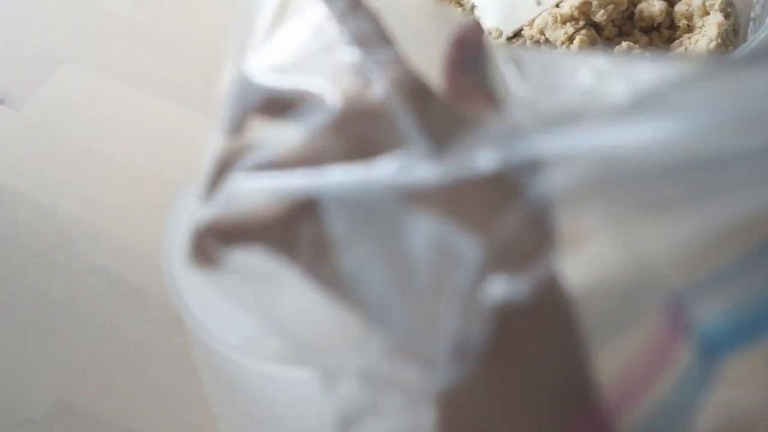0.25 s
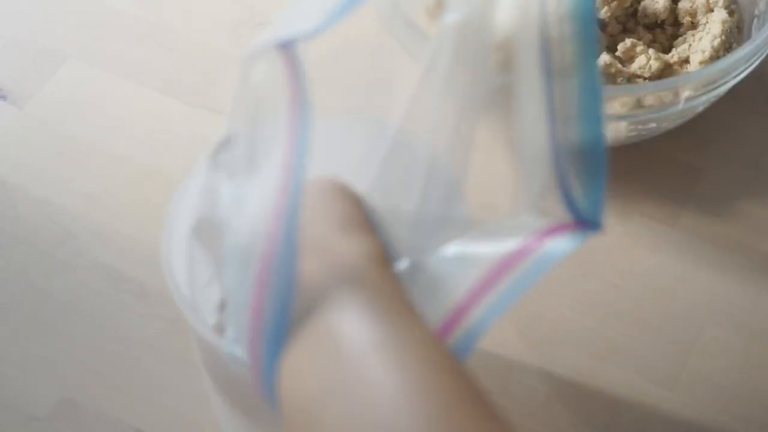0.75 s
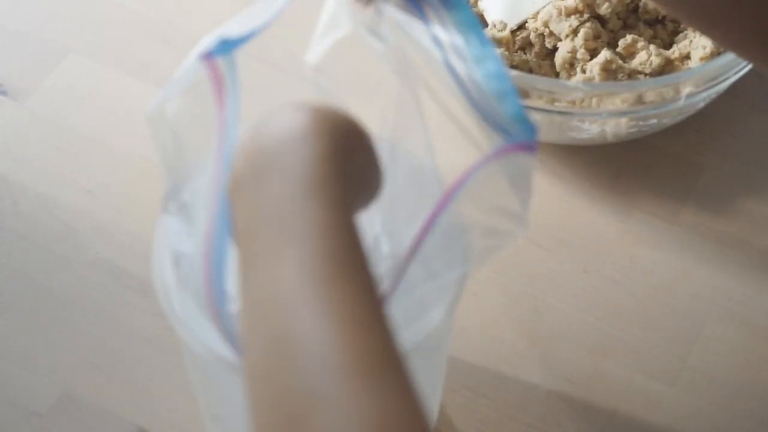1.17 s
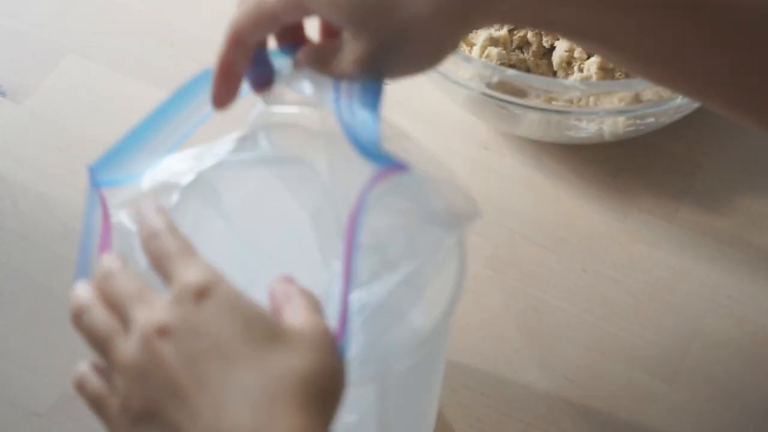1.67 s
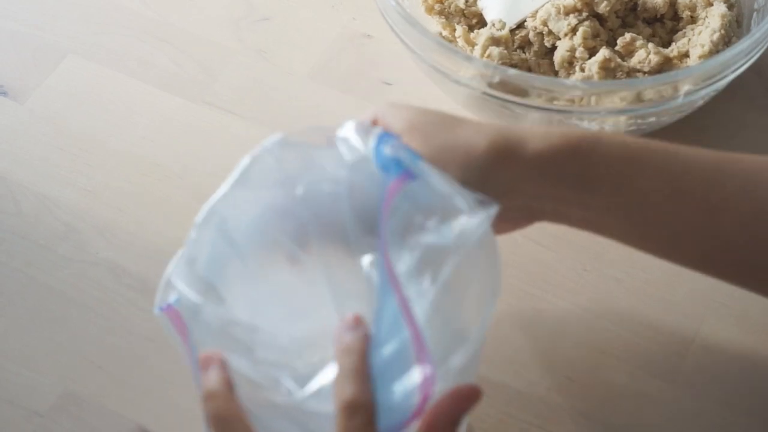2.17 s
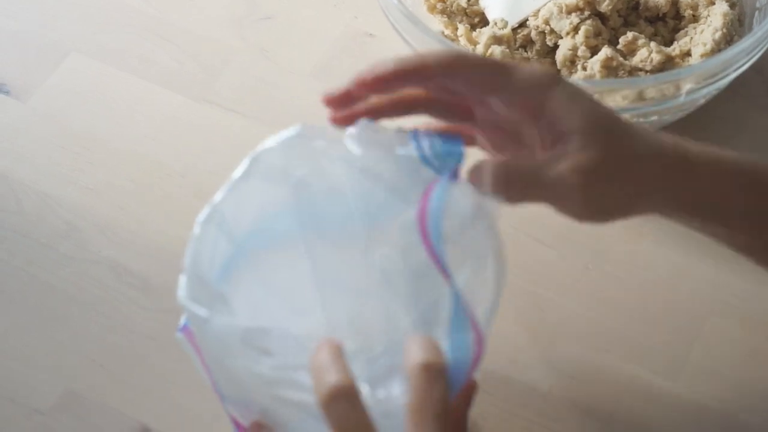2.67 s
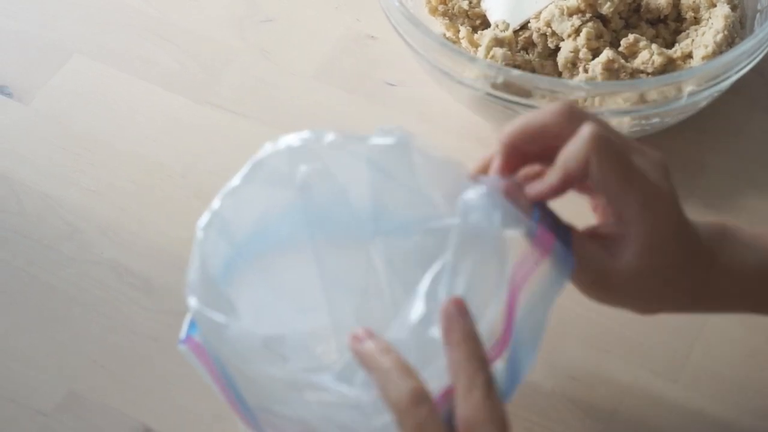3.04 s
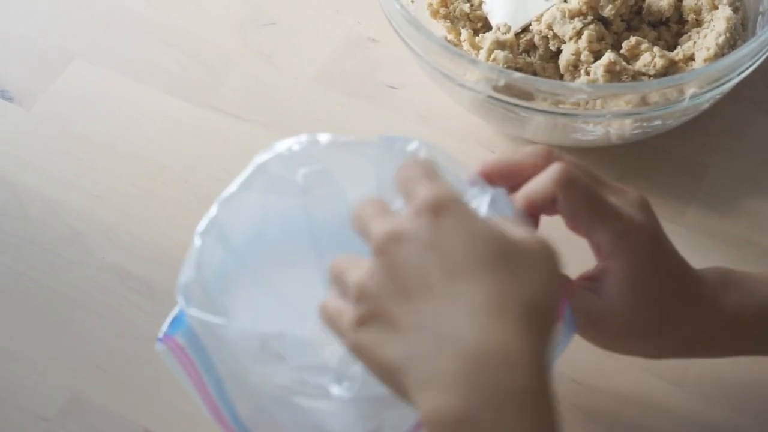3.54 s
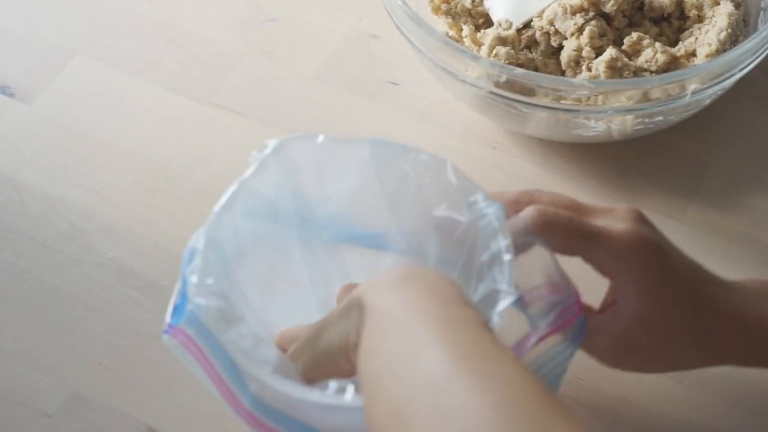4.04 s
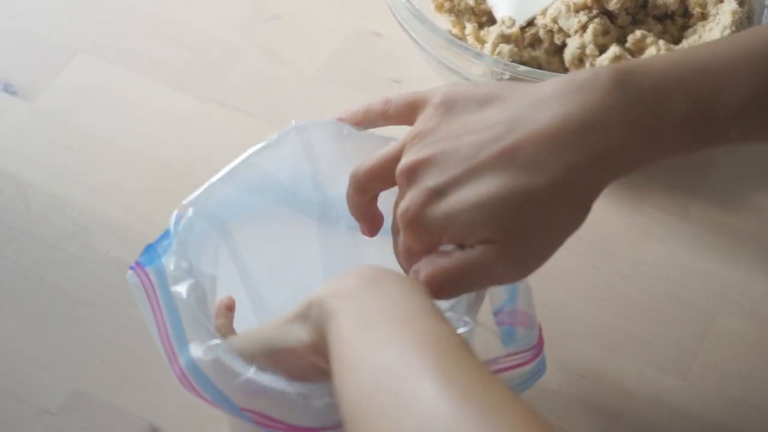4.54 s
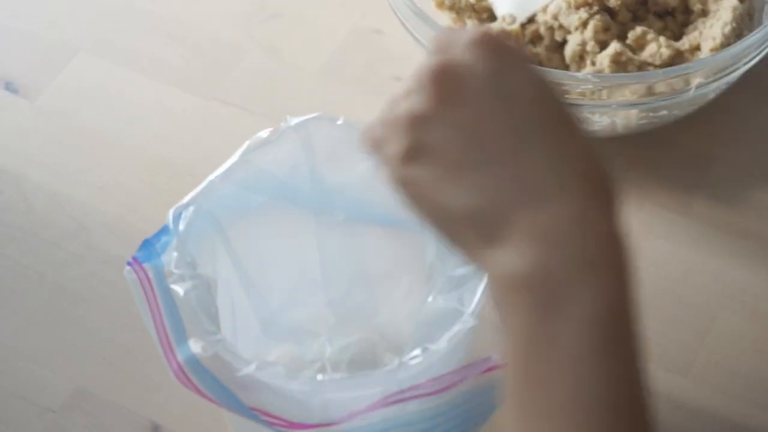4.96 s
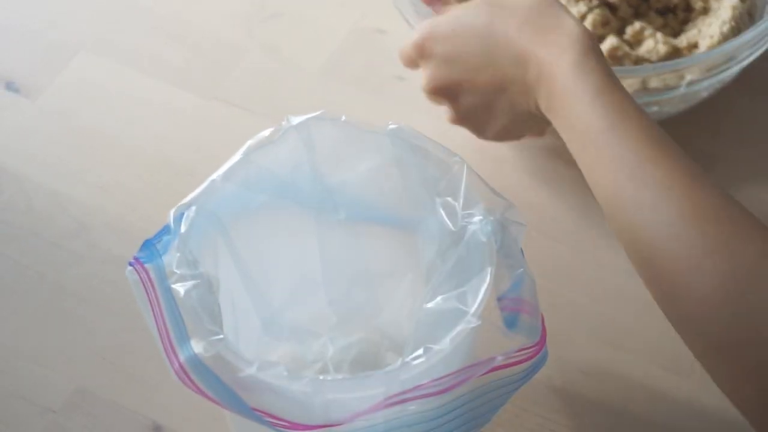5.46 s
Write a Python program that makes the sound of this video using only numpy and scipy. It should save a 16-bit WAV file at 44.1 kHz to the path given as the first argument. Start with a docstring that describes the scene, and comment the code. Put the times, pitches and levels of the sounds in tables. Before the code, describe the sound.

Close crackling and rustling of a plastic bag being folded over a tub's rim, with soft finger taps and a few hollow knocks.

```python
"""Lining a tub with a plastic bag

A small kitchen, one microphone close by on the wooden table, feeding both channels. Hands push a thin
bag into a hollow plastic tub and fold it over the rim. The film crackles and snaps as its creases flip;
the tub hums along, is tapped by fingers and knocks against the table a few times. The walls answer
briefly, over a low murmur of the house."""
import sys
import numpy as np
from scipy import signal
from scipy.fft import rfft, irfft, next_fast_len
from scipy.io import wavfile
from scipy.ndimage import map_coordinates

SR = 44100
rng = np.random.default_rng(int(sys.argv[2]) if len(sys.argv) > 2 else 0)


def store_pcm(level_fs):
    """Save levels as 16-bit WAV."""
    pcm = np.round(np.clip(level_fs, -1, 1) * 32767).astype(np.int16)
    wavfile.write(sys.argv[1], SR, np.atleast_2d(pcm).T)


N = 251370

# The kitchen at rest. Each row: frequency in Hz, relative noise density in dB.
ROOM_SPECTRUM = [(12, -47), (20, -8), (137, -9), (428, -11), (827, -16), (896, -14), (1830, -18.5),
                 (5390, -38), (11000, -44), (14300, -97), (22000, -120)]
# Decay off the walls. Each row: frequency in Hz, t60 in seconds.
ROOM_DECAY = [(250, 0.32), (800, 0.36), (3000, 0.31), (10000, 0.22)]
# Faint thin whistles near the end. Each row: start and stop in seconds, pitch in Hz, level in dB.
WHISTLES = [(5.39, 5.59, 5560, -75), (5.55, 5.59, 7100, -74), (5.08, 5.46, 3120, -73)]
# Modes of tub and table top. Each row: frequency in Hz, relative level in dB, t60 in seconds.
TUB_MODES = [(174, -26.5, 0.049), (214, -37, 0.052), (281.3, 4, 0.14), (354, -0.5, 0.063), (443, 5, 0.066),
             (538.5, 6, 0.045), (625, 0, 0.054), (725, 1.5, 0.025), (872, -11, 0.13), (1098, -24, 0.042),
             (1127, 2, 0.022), (1244, -2.5, 0.032), (1507, 2, 0.025), (1832, -10.5, 0.017),
             (1840, -6.5, 0.022), (2700, 4, 0.0145)]
# Fingers and creases tapping the tub. Each row: start in seconds, level in dB, pitch in Hz.
TAPS = [(0.057, -26.5, 644), (0.534, -28, 517), (0.645, -29, 570), (0.676, -28.5, 446), (1.075, -31.5, 487),
        (1.63, -33, 490), (1.681, -32, 420), (1.699, -29.5, 445), (1.776, -26, 554), (1.848, -31, 484),
        (2.363, -34.5, 490), (2.67, -35, 440), (2.936, -34, 520), (3.081, -26.5, 433), (3.163, -31.5, 540),
        (3.208, -34, 506), (3.348, -33, 496), (3.445, -32.5, 470), (3.74, -22.5, 450), (3.895, -26, 510),
        (3.952, -27, 422), (3.994, -32.5, 443), (4.038, -28, 480), (4.093, -35, 470), (4.47, -43, 466),
        (4.652, -34, 507), (4.798, -39, 450), (5.022, -38, 520), (5.124, -41.5, 506), (5.264, -41.5, 507),
        (5.345, -43, 700)]
# The tub hitting the table. Each row: start in seconds, strength in dB, tilt of the modes in dB per
# octave, thud level in dB relative to the strength, thud pitch in Hz, thud t60 in milliseconds.
KNOCKS = [(0.7833, -2.5, 3.5, -2, 614, 24), (.7925, -21, 3, 19.5, 485, 28), (0.8034, -26, 7.5, 5, 540, 20),
          (0.9197, -4.5, 3, 8.5, 445, 9.3), (.947, -27, 3, 7, 630, 25), (3.6093, -30, 7, 6.5, 480, 75),
          (3.7553, -27.5, 10.5, 17, 446, 21), (3.7606, -14, -1.5, 4, 453, 41), (4.499, -35, 2, -1, 434, 40),
          (4.5512, -40, 8, 10, 460, 64), (4.57, -34, -7.5, 10, 467, 23), (5.471, -36, 2, -11, 450, 30),
          (5.48, -37, -0.5, -7, 696, 55), (5.512, -36, -1, -0.5, 407, 37)]
# The hands at work, one list a stretch. Each row: time in seconds, crackle in dB, tub hum in dB.
HANDLING = [
    [(0.0, -28.5, -52), (0.06, -34, -48.5), (0.236, -43.5, -60), (0.348, -50.5, -71), (0.5, -52.5, -57)],
    [(0.53, -48.5, -57), (0.6, -47.5, -53), (0.7, -47.5, -50), (0.775, -42.5, -49)],
    [(0.79, -37, -40), (0.862, -40.5, -35), (0.915, -38.5, -34)],
    [(0.93, -42.5, -40), (1.068, -50, -54), (1.216, -52, -57.5), (1.296, -61.5, -69), (1.5, -65.5, -77)],
    [(1.53, -46.5, -52), (1.574, -51, -50), (1.706, -42.5, -44.5), (1.816, -47, -64), (2.1, -52, -53)],
    [(2.13, -53, -54), (2.222, -50.5, -53.5), (2.4, -50, -60.5), (2.702, -54, -58), (2.865, -53, -57.5)],
    [(2.885, -45.5, -58), (3.089, -51.5, -50), (3.243, -43, -50.5), (3.401, -56, -67), (3.59, -66.5, -71)],
    [(3.605, -38, -47), (3.659, -37.5, -38.5), (3.75, -38, -52)],
    [(3.77, -36.5, -34), (3.82, -36, -42.5), (3.996, -41.5, -53.5), (4.17, -43.5, -53.5), (4.29, -56, -69)],
    [(4.31, -48, -58), (4.382, -49, -60.5), (4.51, -44, -42.5), (4.588, -39.5, -53), (4.72, -58, -66)],
    [(4.76, -54, -59.5), (5.028, -66, -67), (5.264, -64, -72), (5.42, -65.5, -78)],
    [(5.45, -58.5, -62), (5.7, -63.5, -79)],
]
# Colour of the crackling film. Each row: frequency in Hz, relative gain in dB.
FILM_COLOUR = [(300, -6.5), (800, -2), (1400, 2.5), (2200, -1), (5000, 1), (11000, -1.5)]
# The loudest creases flipping. Each row: start in seconds, level in dB, pitch in Hz, treble in dB.
SNAPS = [(0.0064, -3.5, 1890, -30), (0.0356, -6.5, 1970, -29), (0.075, -10, 3590, 1),
         (0.1063, -11.5, 2670, 6), (0.1228, -22, 1760, -6), (0.1406, -12, 3300, -14), (0.172, -8, 4670, 5),
         (0.1784, -10.5, 2350, -10), (0.249, -15.5, 3310, -10), (0.2582, -20, 3240, -2),
         (0.2671, -11.5, 3430, 5), (0.306, -19, 3630, -7), (0.343, -21, 3420, -21),
         (0.3746, -15.5, 3100, -25), (0.406, -25, 3250, -10), (0.4405, -24, 4880, -2),
         (0.4495, -23.5, 2870, -12), (0.5357, -19.5, 1480, -38), (0.596, -23.5, 3540, -27),
         (0.625, -15.5, 2850, -6), (0.644, -31, 3420, -18), (0.6512, -22, 1580, -26),
         (0.6602, -16.5, 1280, -22), (0.7362, -32, 3630, 0), (0.784, -16, 1230, -34),
         (0.841, -17, 1410, -7), (0.8638, -14, 1330, 14), (0.9043, -19, 2070, -12),
         (0.9194, -12.5, 1530, -26), (0.9464, -14.5, 2670, -2), (0.9658, -14, 1460, -22),
         (1.0147, -24, 3440, -12), (1.077, -14, 3020, -10), (1.0868, -18, 3250, -13),
         (1.2316, -35.5, 2560, -11), (1.4548, -38.5, 2660, -17), (1.5328, -17, 3460, -22),
         (1.6036, -13, 1400, 1.5), (1.6322, -28, 2300, -10), (1.6483, -15, 2170, -22),
         (1.6822, -20.5, 1770, -16), (1.7025, -12.5, 5800, -10), (1.724, -16, 3630, 10),
         (1.735, -13.5, 2140, 8), (1.7914, -17, 5800, 3), (1.805, -17, 5700, -10), (1.8186, -17, 2660, -5),
         (1.8465, -10.5, 3260, -20), (1.8956, -16.5, 2060, -32), (1.9008, -11.5, 2630, -34),
         (1.915, -23, 2600, -17), (1.962, -19.5, 2580, -31), (1.9777, -20, 2030, -22),
         (2.0043, -9, 4220, -8), (2.0328, -22, 1390, 3), (2.135, -17.5, 3770, -4), (2.145, -30, 3430, -10),
         (2.189, -19, 2640, 1), (2.2249, -16.5, 1660, -2), (2.231, -23, 2000, -7), (2.252, -14.5, 4450, 0),
         (2.2664, -21, 3400, -10), (2.3049, -20, 5230, -6), (2.3257, -19.5, 2010, -25),
         (2.381, -23.5, 2970, -7), (2.399, -20, 3140, -10), (2.4182, -23.5, 2240, 5),
         (2.4446, -10, 2520, 10), (2.4767, -18, 6310, -6), (2.4913, -18.5, 2820, -8),
         (2.5236, -17, 3200, -1), (2.5372, -16.5, 3300, -4), (2.583, -19.5, 3300, -10),
         (2.6699, -15, 2820, 3), (2.676, -21.5, 5830, -6), (2.8676, -31, 1610, -8),
         (2.8779, -20.5, 5270, 4), (2.8881, -13, 1420, -19), (2.91, -16, 1800, -1),
         (2.9932, -17.5, 3080, -7), (3.0048, -22, 3080, 1), (3.031, -15.5, 5150, -10),
         (3.0799, -16.5, 2440, -34), (3.1083, -13, 5210, 4), (3.1662, -16, 3660, 5),
         (3.2006, -16, 5400, -3), (3.252, -23, 2680, 0), (3.3063, -23.5, 2850, 0),
         (3.4405, -16.5, 2840, -22), (3.6067, -7.5, 3300, -7), (3.6153, -10.5, 2030, -6),
         (3.7065, -27, 2660, -4), (3.7434, -14.5, 1900, -8), (3.7519, -12.5, 1500, 2),
         (3.8374, -13.5, 6120, 12), (3.8721, -20, 2000, -1), (3.936, -17, 1920, -18),
         (3.9931, -16.5, 3190, 5), (4.031, -20.5, 3540, 11), (4.0766, -12, 5600, 1),
         (4.0982, -12, 3000, 11), (4.1981, -16.5, 2680, 3), (4.3042, -22, 1750, 2),
         (4.3093, -21, 1680, -10), (4.329, -16, 5000, -7), (4.371, -15.5, 3000, 11),
         (4.4283, -19, 3500, -6), (4.446, -17.5, 1450, -23), (4.4645, -18, 1540, -16),
         (4.4723, -15, 3000, 7), (4.4908, -19.5, 3210, -17), (4.5351, -6, 6200, 2),
         (4.543, -21.5, 1860, -3), (4.561, -10.5, 6230, 11), (4.5674, -17, 3020, -8),
         (4.5891, -15, 5400, 2), (4.6002, -15, 2610, -15), (4.6121, -13, 3230, 6),
         (4.6349, -10.5, 4800, -1), (4.6538, -17, 2960, -8), (4.687, -23, 5320, -14),
         (4.799, -21.5, 6020, -3), (4.8204, -29, 2900, -12), (4.9177, -32, 1490, -16),
         (4.999, -29, 2120, -20), (5.0225, -36.5, 1560, -22), (5.12, -29.5, 3100, -1),
         (5.2621, -27, 3250, -35.5)]
# Hiss that sets left apart from right. Each row: frequency in Hz, gain in dB.
SIDE_COLOUR = [(25, -5), (125, -23), (500, -39.5), (2000, -37), (8000, -21), (10800, -23.5), (11800, -38)]
# Colour of the microphone. Each row: frequency in Hz, gain in dB.
MIC_COLOUR = [(2000, 0), (2700, -0.5), (3200, 1), (3600, 1), (3900, -4), (4700, -3), (5500, 2),
              (6300, -1.5), (8000, -2.5)]
# The recorder's treble slope. Each row: frequency in Hz, gain in dB.
TREBLE_SLOPE = [(10950, 1), (11200, -17), (11600, -31), (12300, -53)]

ROOM_TONE_DB, BAND_LIMIT_HZ = -62, 12365
AIR_HZ, AIR_WIDTH_HZ = 503, 113  # resonance of the air in the tub
RING_DB = -14.5  # the tub's modes under the blow
FIRM_DB, TREBLE_DB, TREBLE_GROWTH = -52, -1.5, 1.07  # a firm grip, its treble offset; firmer is brighter
CLUMP_DB, HUM_FOLLOWS = 2.5, 1.1  # depth of the crackle's clumps; how strongly the hum follows them
SNAP_T60_S, LOWER_LONGER = 0.011, 0.79  # a crease at 3 kHz dies this fast; low ones last longer
FLIP = 3.95  # the sudden flip of a crease against the rustle that follows it


def amp(db):
    return 10 ** (np.asarray(db) / 20)


def unit_rms(x):
    return x / np.sqrt(np.mean(x ** 2) + 1e-20)


def along(points, hz):
    """A curve of (Hz, value) points, read on a log frequency axis."""
    f, values = np.transpose(points)
    return np.interp(np.log(hz + 1), np.log(f + 1), values)


def filtered(x, response):
    """x through a complex response of frequency."""
    size = next_fast_len(N + SR // 2)
    return irfft(rfft(x, size) * response(np.fft.rfftfreq(size, 1 / SR)), size)[..., :N]


def resonance(f, hz, width):
    """One causal resonance of gain 1."""
    return 1j * f * width / (hz * hz - f * f + 1j * f * width)


def place(seconds, rows):
    """Sums short sounds, one row each, at their times."""
    at = np.round(seconds * SR).astype(int)[:, None] + np.arange(rows.shape[1])
    return np.bincount(at.ravel(), rows.ravel(), N + SR)[:N]


def room_tone():
    """Low murmur of the house and hiss of the microphone."""
    noise = filtered(rng.standard_normal(N), lambda f: amp(along(ROOM_SPECTRUM, f)))
    return amp(ROOM_TONE_DB) * unit_rms(noise)


def kitchen_walls(x, block_s=0.25, delay_samples=130):
    """Near walls answer, each frequency dying at its own speed; a new tail each block as hands move."""
    out, block = np.zeros(N + SR), round(block_s * SR)
    for start in range(0, N, block):
        hz, t, spectra = signal.stft(rng.standard_normal(SR // 2), SR, nperseg=256)
        tail = signal.istft(spectra * amp(-60 * t / along(ROOM_DECAY, hz)[:, None]), SR, nperseg=256)[1]
        wet = signal.fftconvolve(x[start:start + block], tail / np.linalg.norm(tail))
        arrival = start + delay_samples
        out[arrival:][:len(wet)] += wet[:N + SR - arrival]
    return out[:N]


def whistles():
    """Narrow, unsteady bands of noise that swell and stop."""
    out, t = np.zeros(N), np.arange(N) / SR
    for start, stop, hz, db in WHISTLES:
        swell = np.clip((t - start) / (stop - start), 0, 1) ** 0.5 * np.clip((stop - t) / 0.015, 0, 1)
        band = filtered(rng.standard_normal(N), lambda f: resonance(f, hz, width=70) ** 2)
        out += amp(db) * swell * unit_rms(band)
    return out


def thuds(hz, t60, rise_s, size=4096):
    """Short hollow notes: sines that rise quickly and die away."""
    t = np.arange(size) / SR
    return np.sin(2 * np.pi * hz[:, None] * t) * amp(-60 * t / t60) * (1 - np.exp(-t / rise_s))


def table_jolts():
    """Hard knocks shake the table under the microphone: a low push that grows faster than the blow."""
    starts, db = np.transpose(KNOCKS)[:2]
    pushes = thuds(hz=np.full(len(starts), 45), t60=0.083, rise_s=0.0033)
    return place(starts, amp(4.9 * db - 21)[:, None] * pushes)


def tub_taps():
    """A light touch sounds only the air in the tub."""
    starts, db, hz = np.transpose(TAPS)
    return place(starts, amp(db)[:, None] * thuds(hz, t60=0.023, rise_s=0.00045))


def tub_knocks():
    """Every knock thuds and rings the same modes of tub and table; where it lands sets the balance."""
    starts, db, tilt_db, thud_db, thud_hz, thud_ms = np.transpose(KNOCKS)
    hz, mode_db, t60 = np.transpose(TUB_MODES)
    modes = thuds(hz, t60[:, None], rise_s=0.0013, size=SR // 2)
    scatter_db = rng.normal(0, 1.5, (len(starts), len(hz)))
    balance_db = mode_db + tilt_db[:, None] * np.log2(hz / 450) + scatter_db
    ring = amp(db[:, None] + RING_DB + balance_db) @ modes
    thud = amp(db + thud_db)[:, None] * thuds(thud_hz, thud_ms[:, None] / 1000, rise_s=0.0011)
    return place(starts, ring) + place(starts, thud)


def tub_hum(clumps):
    """Fingers shake the tub unevenly; its air and its low modes answer."""
    def response(f):
        modes = sum((-1) ** k * amp(db) * resonance(f, hz, np.log(1000) / np.pi / t60)
                    for k, (hz, db, t60) in enumerate(TUB_MODES))
        return (resonance(f, AIR_HZ, AIR_WIDTH_HZ) + 1.18 * modes) / (1 + (f / 800) ** 4)

    shake = unit_rms(clumps ** HUM_FOLLOWS * rng.standard_normal(N) ** 3)
    return unit_rms(filtered(shake, response))


def creases(hz, treble_db, t60, q, broad_db, size=1024):
    """Each crease flips with a click and a dying puff of noise, ringing at its pitch; energy 1."""
    t, f = np.arange(size) / SR, np.fft.rfftfreq(size, 1 / SR)
    puff = rng.standard_normal((len(hz), size)) * amp(-60 * t / t60[:, None])
    puff[:, 0] += FLIP
    ring = resonance(f, hz[:, None], hz[:, None] / q)
    treble = amp(treble_db)[:, None] * resonance(f, hz=9660, width=2670)
    colour = (ring + amp(broad_db) + treble) * resonance(f, hz=2900, width=8100)
    bursts = irfft(rfft(puff) * colour, size)
    return bursts / np.linalg.norm(bursts, axis=1, keepdims=True)


def bag_crackle(count=11000, clump_rate_hz=60):
    """Small creases of uneven size, in clumps, over the rub of film on skin; the tub hums along."""
    t = np.arange(N) / SR
    times, *levels = np.transpose(np.concatenate(HANDLING))
    body_db, hum_db = [np.interp(t, times, db) for db in levels]
    treble_db = FIRM_DB + TREBLE_DB + TREBLE_GROWTH * (body_db - FIRM_DB)
    when, force, pitch, length = rng.random((count, 4)).T
    strength = amp(np.minimum(-4.5 * np.log(1 - force), 16))  # many weak, a few strong
    grains = creases(hz=1300 * 7 ** pitch, treble_db=np.full(count, -8), t60=0.0018 + 0.015 * length,
                     q=1.73, broad_db=-12, size=256)
    clumps = amp(CLUMP_DB * map_coordinates(rng.standard_normal(400), [t * clump_rate_hz]))
    creasing = unit_rms(clumps * place(when * N / SR, strength[:, None] * grains))
    rub = 0.4 * rng.standard_normal(N)
    grip = 1 / (1 + amp(-56.5 - body_db))  # gentle handling mostly rubs, firm handling creases
    film = (grip * creasing + rub) / np.sqrt(grip ** 2 + 0.83)

    def lowpass(f):
        return 1 / (1 + (f / 4500) ** 8)

    body = unit_rms(filtered(film, lambda f: amp(along(FILM_COLOUR, f)) * lowpass(f)))
    treble = unit_rms(filtered(film, lambda f: amp(along(FILM_COLOUR, f)) * (1 - lowpass(f))))
    return amp(body_db) * body + amp(treble_db) * treble + amp(hum_db) * tub_hum(clumps)


def bag_snaps():
    """Each big crease clicks once as it flips."""
    starts, db, hz, treble_db = np.transpose(SNAPS)
    clicks = creases(hz, treble_db, t60=SNAP_T60_S * (3000 / hz) ** LOWER_LONGER, q=3.6, broad_db=-6)
    clicks /= np.abs(clicks).max(axis=1, keepdims=True)
    return place(starts, amp(db)[:, None] * clicks)


def scene():
    """Bag and tub up close, the kitchen behind; a faint hiss follows the sound and gives it width."""
    blows = tub_knocks() + tub_taps()
    hollow = filtered(blows, lambda f: resonance(f, hz=957, width=4170) ** 2)  # a small tub has no bass
    snaps = bag_snaps()
    walls = kitchen_walls(amp(-5) * snaps + amp(-8.5) * hollow)
    mid = snaps + hollow + walls + bag_crackle() + whistles() + table_jolts() + room_tone()
    spectra = signal.stft(mid, nperseg=1024)[2]
    random_phase = np.exp(2j * np.pi * rng.random(spectra.shape))
    hiss = signal.istft(spectra * random_phase, nperseg=1024)[1][:N]
    side = filtered(hiss, lambda f: amp(along(SIDE_COLOUR, f)))
    return np.array([mid + side, mid - side])


def record(dry):
    """The microphone colours the treble; in the recorder it falls steeply and ends at the band limit."""
    return filtered(dry, lambda f: amp(along(MIC_COLOUR, f) + along(TREBLE_SLOPE, f)) * (f < BAND_LIMIT_HZ))


dry = scene()
out = record(dry)
store_pcm(out)
```